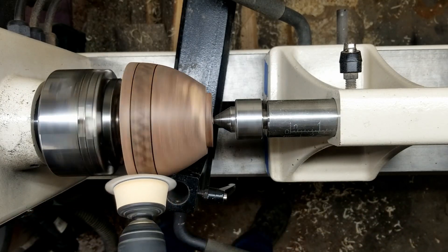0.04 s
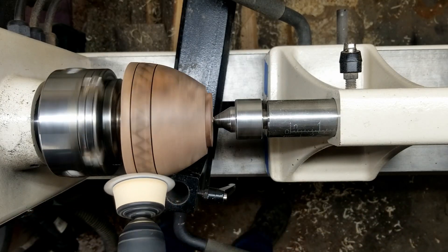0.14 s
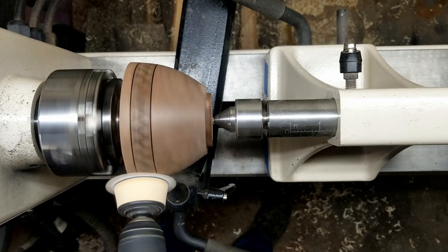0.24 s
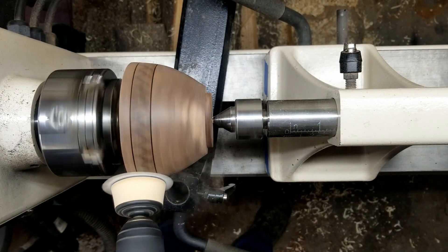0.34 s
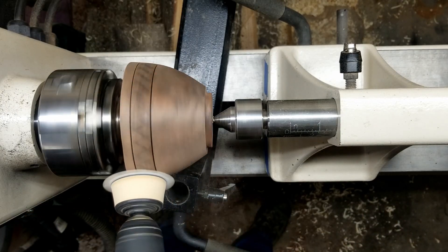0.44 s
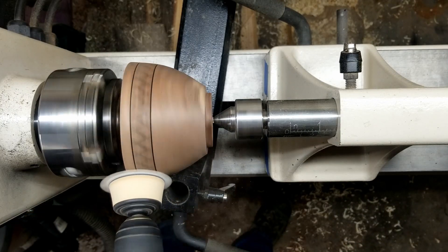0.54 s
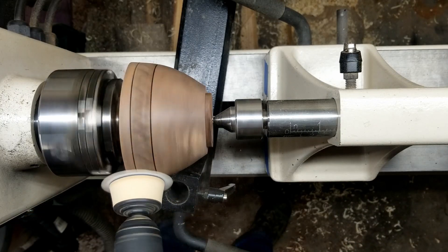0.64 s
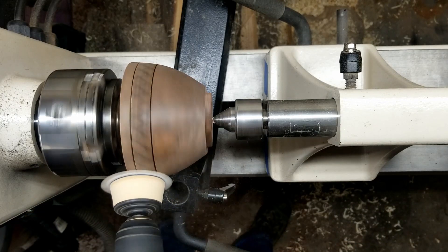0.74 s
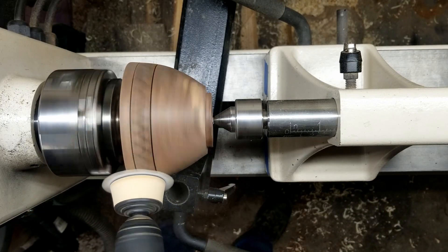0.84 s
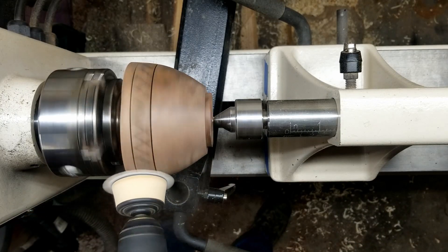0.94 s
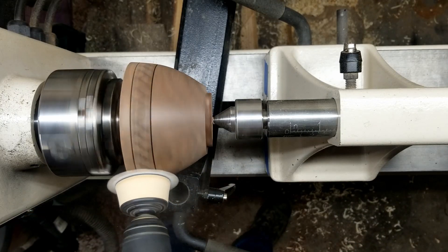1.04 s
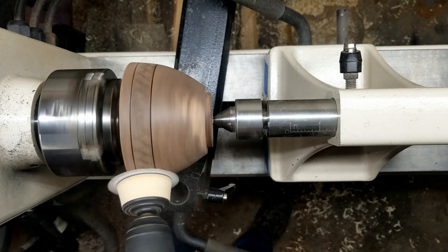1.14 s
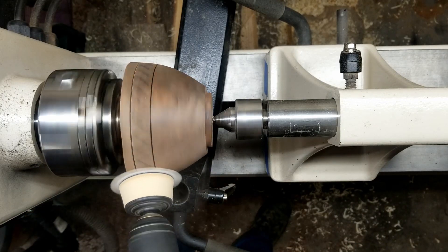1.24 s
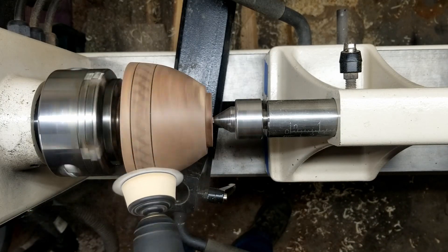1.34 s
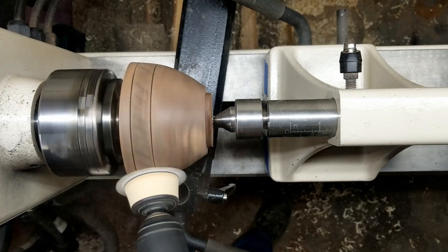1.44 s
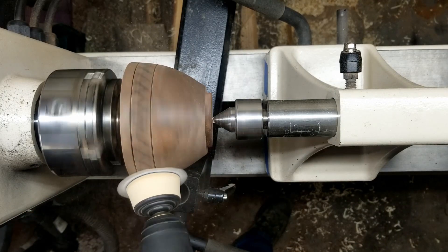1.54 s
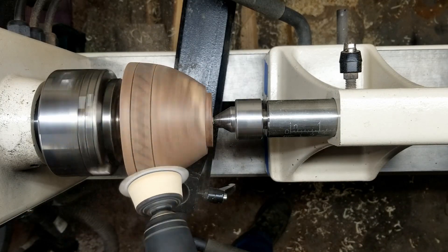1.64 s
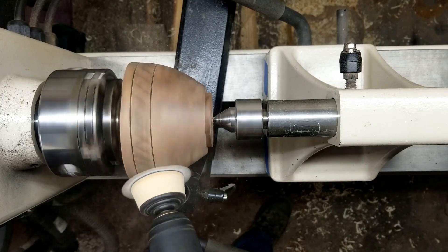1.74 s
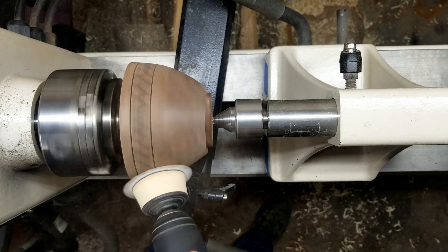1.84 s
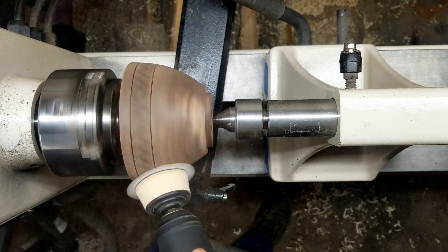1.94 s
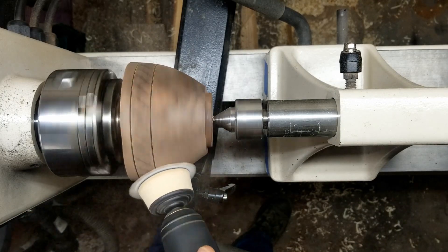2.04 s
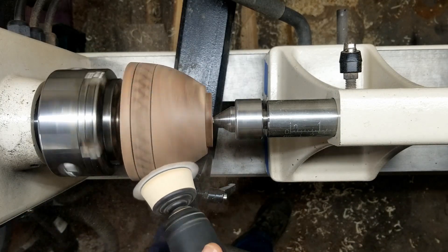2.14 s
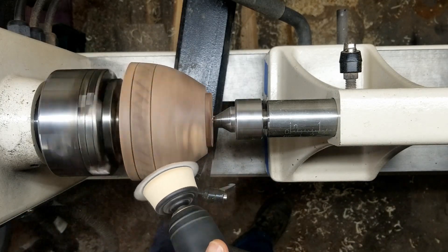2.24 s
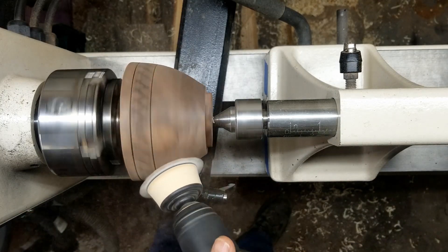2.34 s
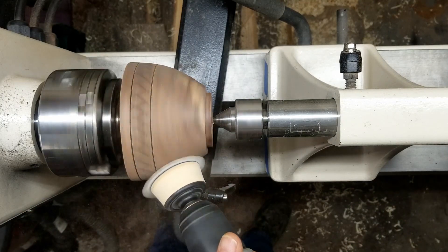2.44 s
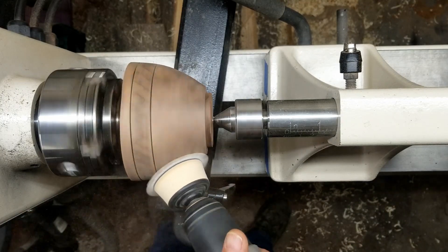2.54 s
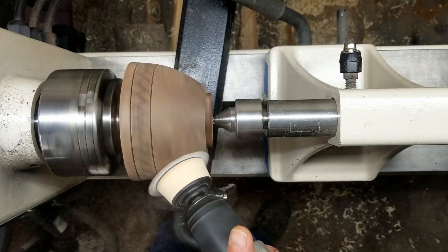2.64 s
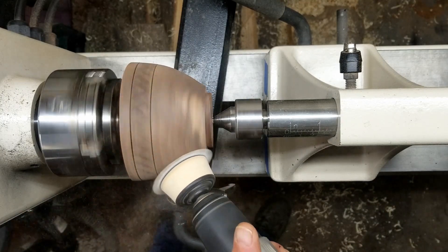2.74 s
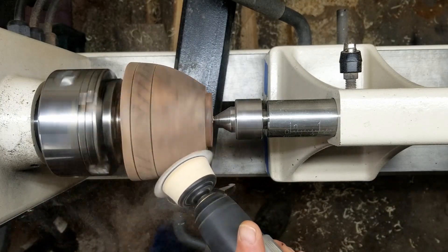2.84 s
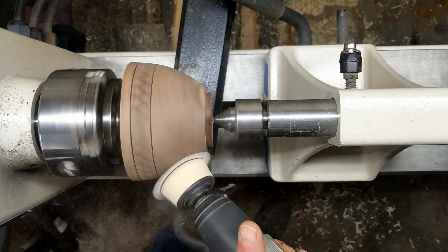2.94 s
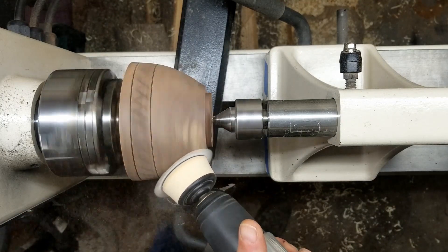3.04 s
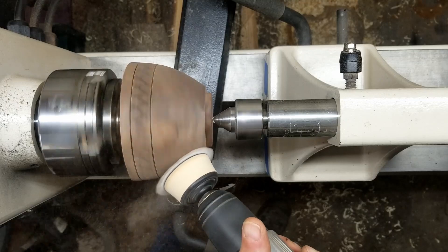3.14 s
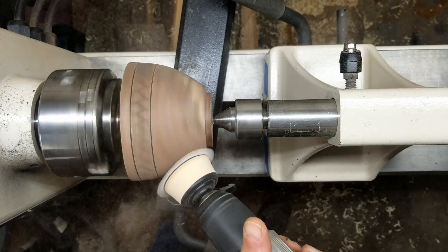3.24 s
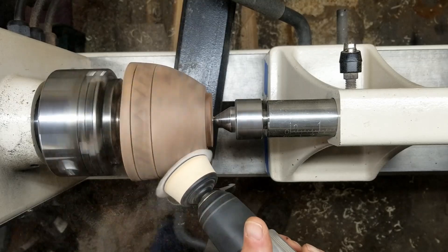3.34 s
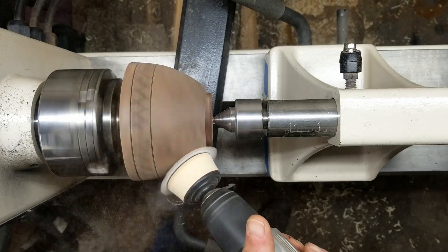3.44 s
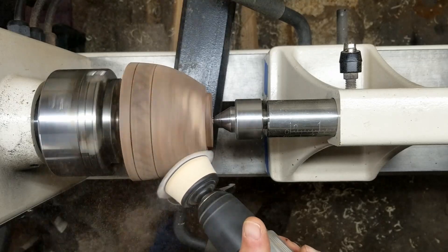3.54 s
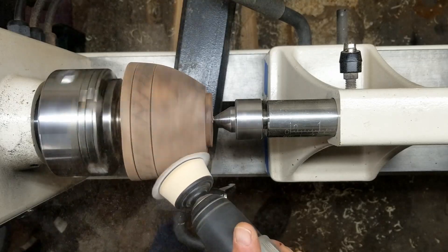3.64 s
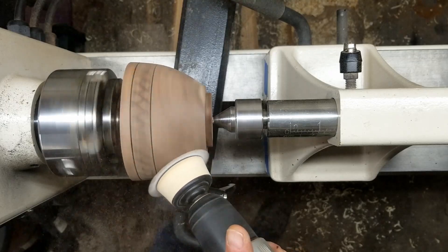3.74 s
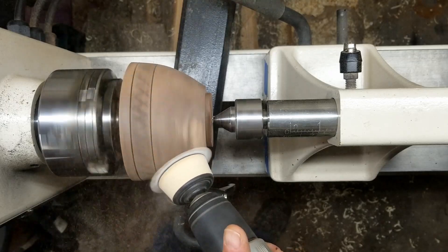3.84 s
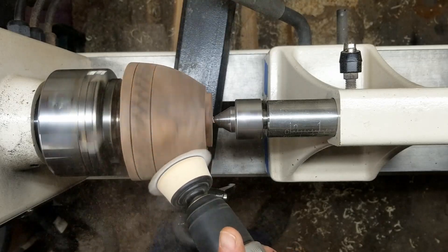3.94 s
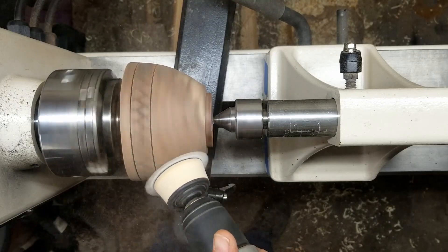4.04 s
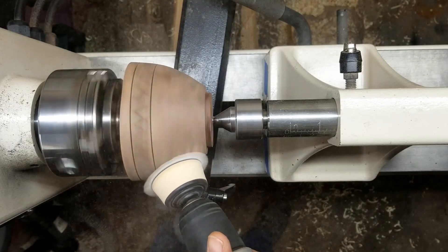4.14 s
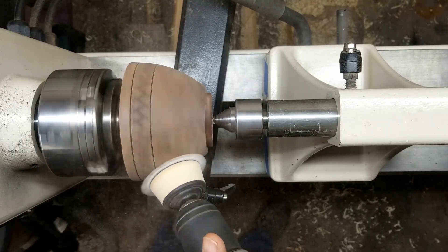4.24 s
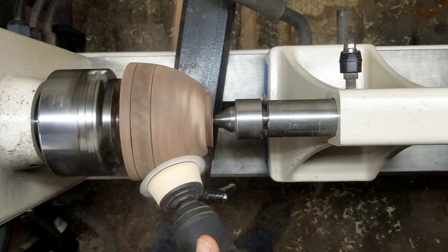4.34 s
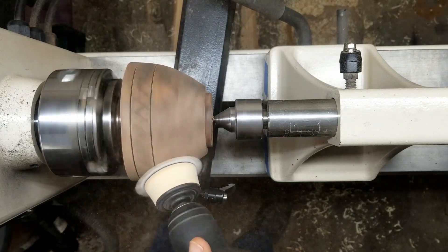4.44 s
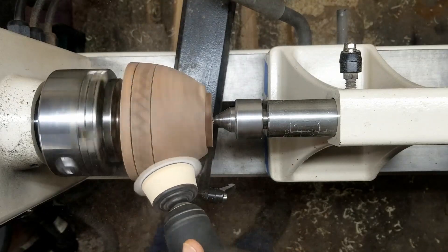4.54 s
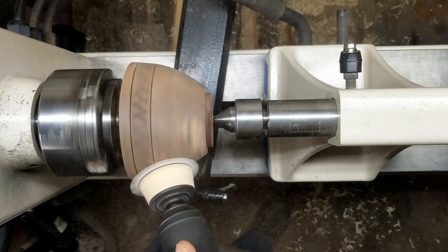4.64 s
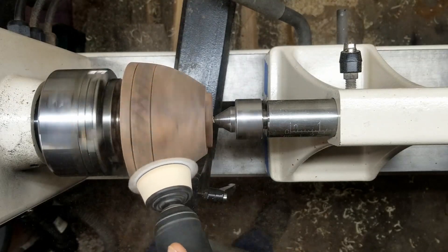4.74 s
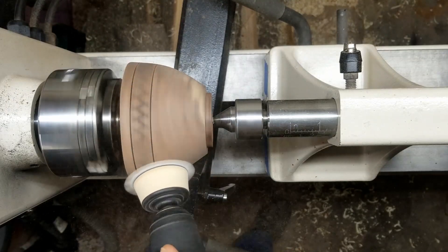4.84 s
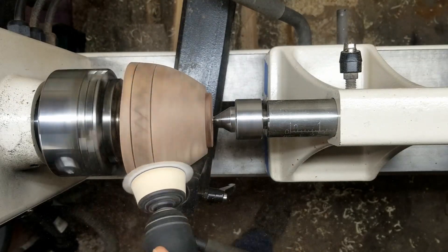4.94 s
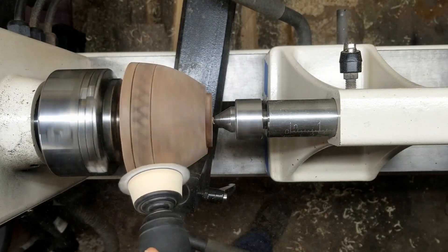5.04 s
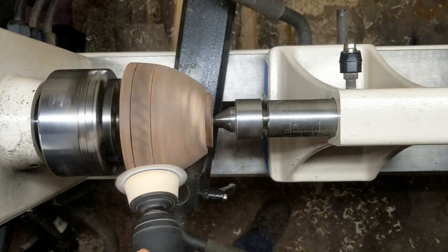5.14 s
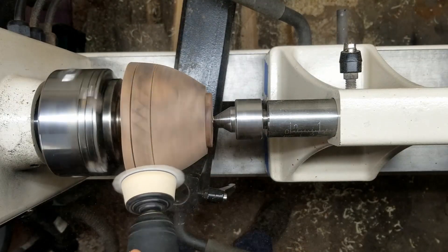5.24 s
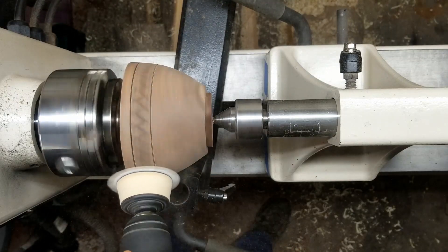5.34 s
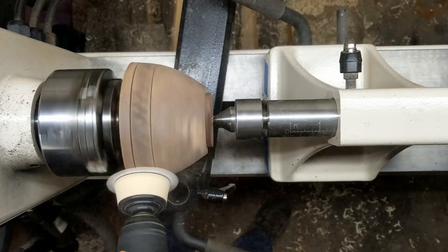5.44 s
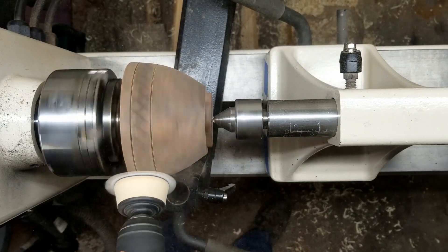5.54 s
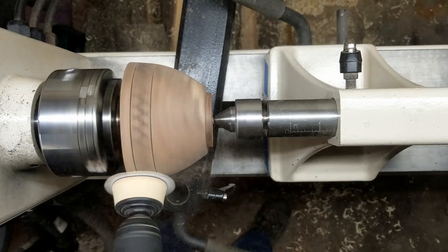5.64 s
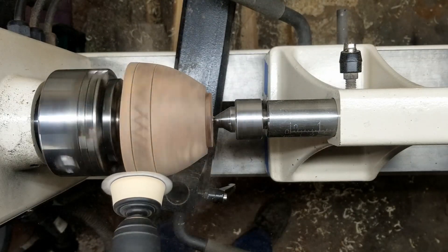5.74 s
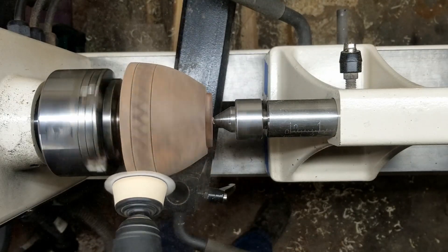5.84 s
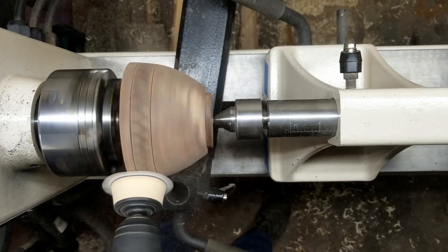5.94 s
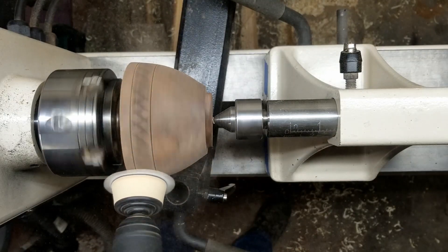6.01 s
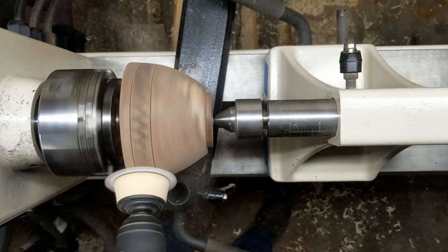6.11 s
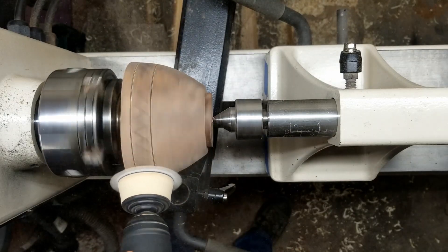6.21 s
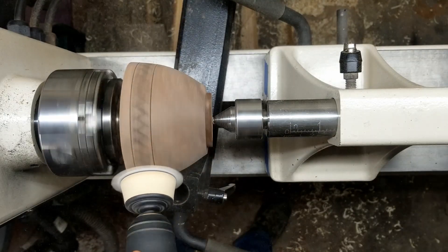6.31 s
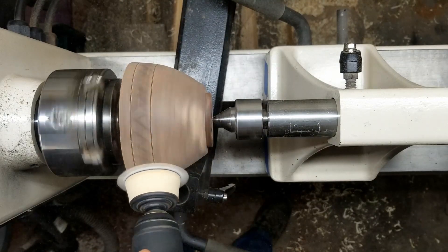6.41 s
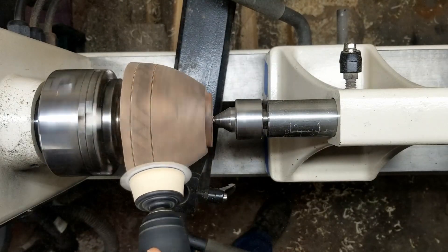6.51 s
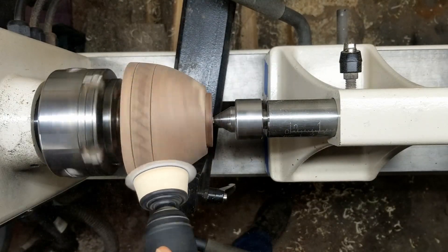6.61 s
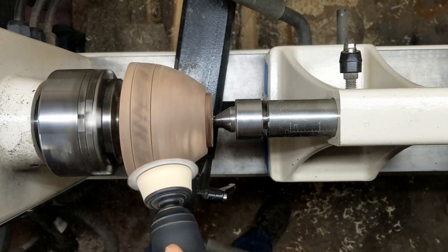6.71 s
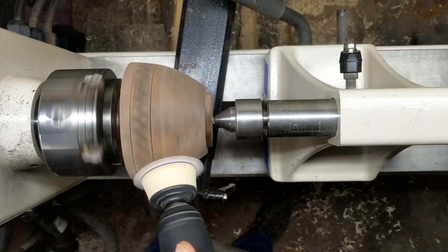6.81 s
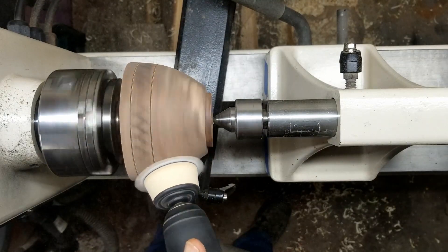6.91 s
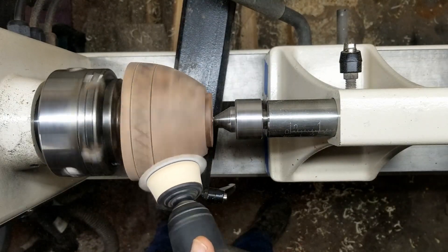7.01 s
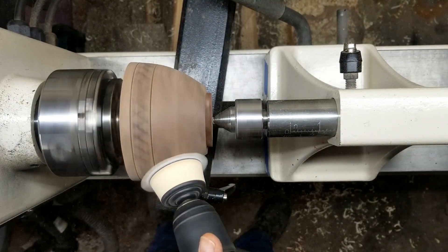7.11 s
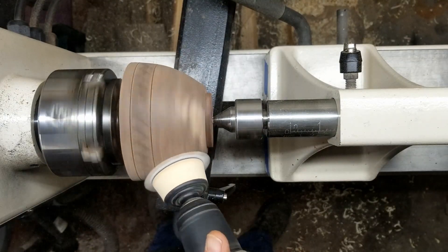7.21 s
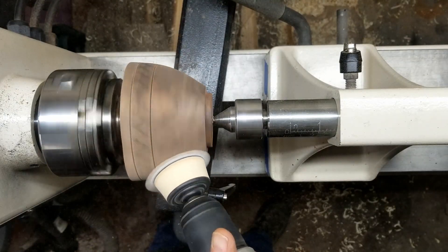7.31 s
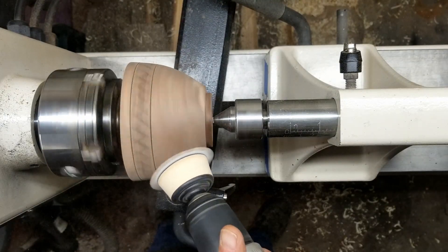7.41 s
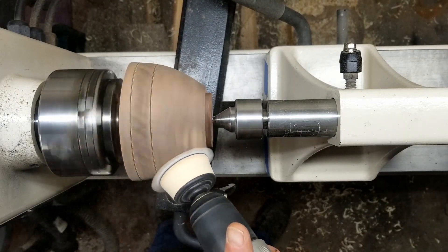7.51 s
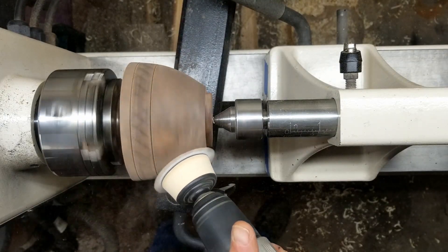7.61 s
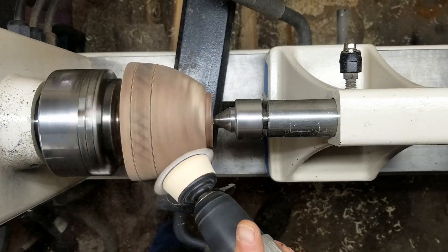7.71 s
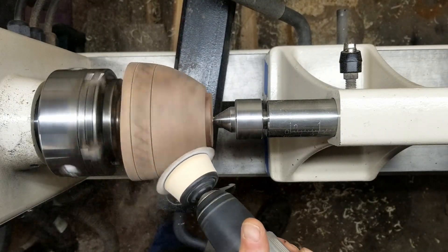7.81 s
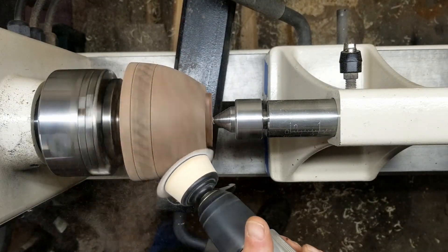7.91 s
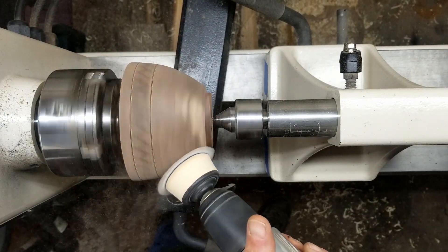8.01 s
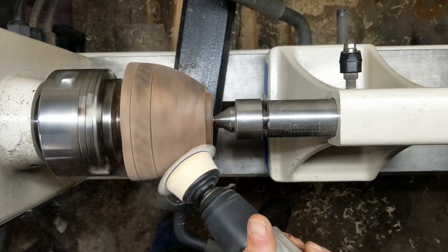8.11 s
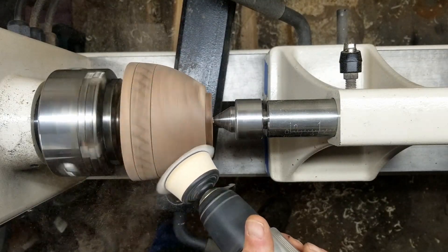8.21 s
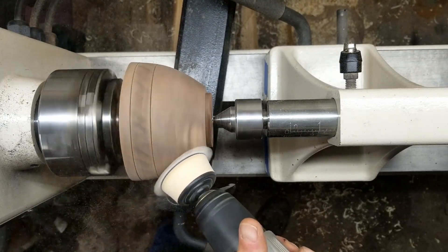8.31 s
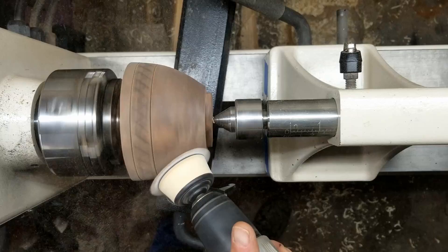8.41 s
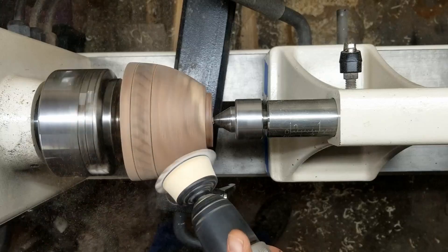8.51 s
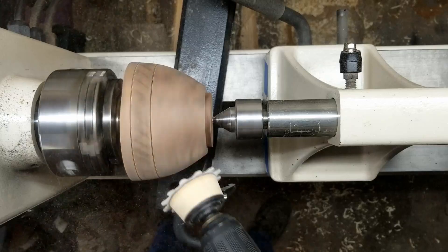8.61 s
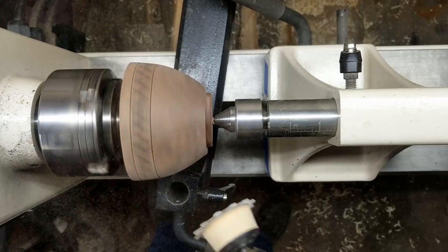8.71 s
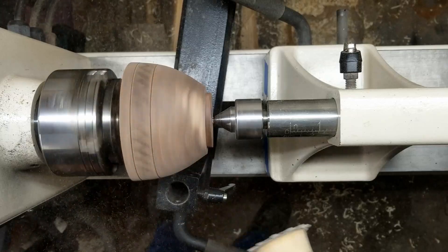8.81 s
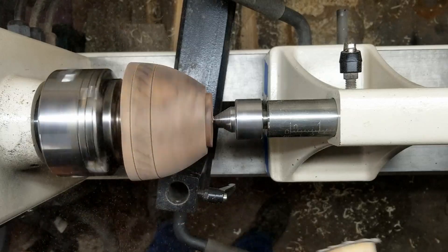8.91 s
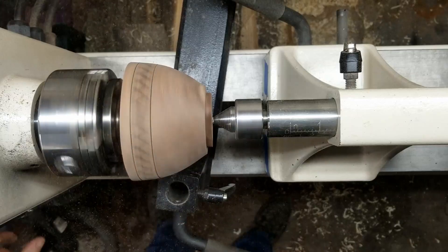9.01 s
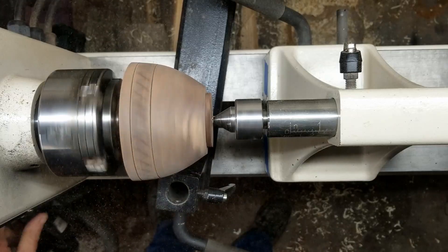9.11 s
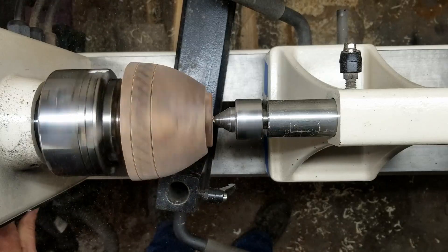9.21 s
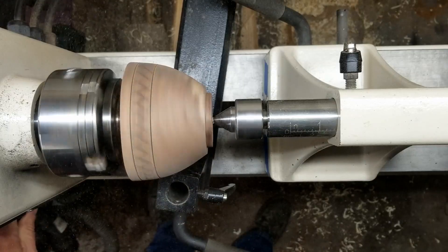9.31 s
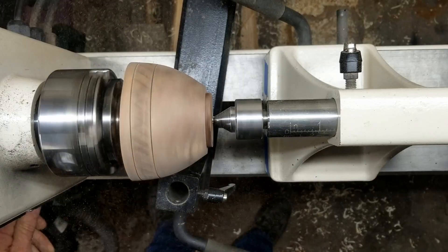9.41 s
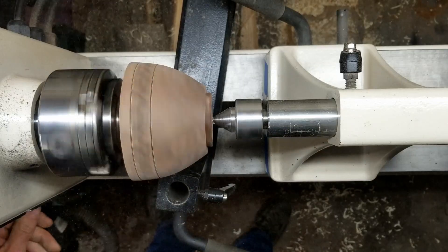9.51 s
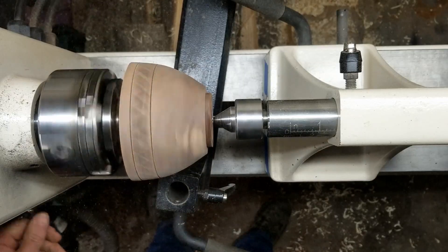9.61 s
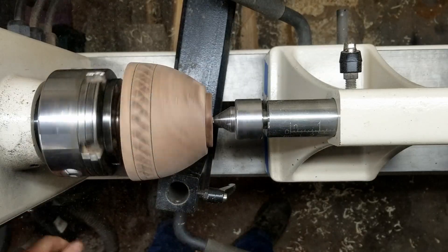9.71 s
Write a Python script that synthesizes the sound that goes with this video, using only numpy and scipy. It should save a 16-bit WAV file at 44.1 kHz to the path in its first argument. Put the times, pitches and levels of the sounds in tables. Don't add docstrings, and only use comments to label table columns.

```python
import sys
import numpy as np
from scipy import signal
from scipy.io import wavfile
from scipy.ndimage import uniform_filter1d, map_coordinates

SR = 44100
rng = np.random.default_rng(int(sys.argv[2]) if len(sys.argv) > 2 else 0)


def gain_from_decibels(decibels):
    exponent = np.asarray(decibels, float) / 20
    return 10 ** exponent


def waveform_to_disk(signal):
    frames = np.transpose(np.atleast_2d(signal))
    scaled = np.clip(frames, -1, 1) * 32767
    samples = np.round(scaled).astype(np.int16)
    wavfile.write(sys.argv[1], SR, samples)


N = 430416
TIME = np.arange(N) / SR

# (time [s], speed [turns/s])
MOTOR_SPEED = [(.24, 327.6), (.85, 322.8), (1.7, 318.8), (2.25, 317.8), (2.72, 319.5), (3.06, 316.0),
               (3.2, 317.2), (3.72, 316.8), (4.1, 319.0), (4.45, 318.2), (4.85, 319.5), (5.27, 317.8),
               (5.61, 317.9), (6.8, 323.5), (7.2, 321.6), (7.48, 322.1), (8.16, 316.7), (8.5, 317.6)]
USUAL_SPEED = 319
TRIGGER_OFF_S, COAST_LOSS_PER_S2 = 8.5, 360
LET_GO_S, LET_GO_DB = .12, -7
SPEEDUP_SMOOTH_S, SPEEDUP_FELT = .25, 2.4
# (level [dB], rise with speeding up [dB per turn/s2], with speed [dB per turn/s], with warming grease [dB/s])
FIFTH, THIRD, FIRST = (-37.5, -0.1, .15, 0.16), (-50.5, 0.95, 1.2, 0.63), (-56.5, 0, 0.35, 0.83)
PLANET_DB = -37
# (multiple of motor speed [x], level [dB])
COMMUTATOR_LINES = [(11, -18), (13, -16), (24, -14), (36, -13), (48, -20), (11.25, -17)]
# (multiple of motor speed [x], level [dB])
PLANET_LINES = [(1.8, -20), (11.59, -17), (8.89, -14), (5.95, -11)]
# (multiple of motor speed [x], level [dB])
UNBALANCE_LINES = [(2, -21), (4, -13), (6, -10)]
# (time [s], length [s], left level [dB], right level [dB], left lead [rad])
VENT_TURNS = [(.2, .8, -30.5, -35, .5), (.76, .42, -32, -41, .7), (1.45, .35, -35, -34, .1),
              (1.87, .4, -37, -41, -1.0), (2.7, .66, -36, -36, -2.5), (3.4, .82, -38, -34.5, -5.6),
              (4.1, .38, -37, -36, -2.6), (4.75, .3, -36, -38, -6.3), (5.3, .85, -31, -39, -6.2),
              (6.1, .7, -40, -42, -5.0), (6.75, .28, -37, -46, -5.5), (7.06, .3, -41, -34, -8.5),
              (7.55, .5, -34, -39, -8.2), (8.13, .58, -37, -33.5, -11), (8.545, .09, -30, -31, -12.5)]
VENT_EDGE_S, VENT_FLOOR_DB = 0.16, -45.5

# (time [s], left-right difference [dB], pressure [dB])
PAD_PATH = [(0, 2.5, -9), (.7, 2.5, -21), (1.2, 2.5, -18), (1.55, 1.4, -5.5), (2.1, 0.8, -0.5),
            (2.75, .2, -0.5), (3.3, -0.8, 2.5), (4.1, 0.5, 4), (4.6, 0.9, 3.5), (5.1, 2.5, 0.5),
            (5.7, 3, -7), (5.95, 2.5, -2), (6.4, 2, -3.5), (6.8, 1.5, -5), (7.2, 1.1, -1.5), (7.8, -0.5, 3),
            (8.54, 0.4, 0.5)]
LAG_PER_DB = -1.5
# (frequency [Hz], width [Hz], level [dB])
HOUSING_MODES = [(359.7, 56, -15.5), (448, 39, -14), (626, 77, -10), (825, 144, -12.5), (1255, 177, -7.5),
                 (1545, 120, -3), (1875, 135, -3), (2283, 293, -9.5), (2624, 260, -8.5), (3340, 450, -13.5),
                 (3710, 220, -10.5), (4220, 1180, -15.5)]
RATTLE_DB, RATTLE_PER_PRESSURE, RATTLE_PER_PAN = -27.5, 0.072, -0.1

# (frequency [Hz], level [dB per Hz])
GRIT_SPECTRUM = [(1700, -31), (2500, -1), (2800, -9), (3600, -8.5), (4300, -10.5), (5200, -11.5),
                 (5900, -5), (7000, -7), (8300, -9), (10500, -5.5), (12400, -2.5), (14000, -4.5),
                 (15600, -3), (18000, -3.5)]
# (frequency [Hz], likeness [-1 to 1])
SIDE_LIKENESS = [(60, .85), (300, .7), (700, .78), (1400, .88), (3000, .4), (6000, 0.03), (15000, 0.02)]
# (frequency [Hz], left-right difference [dB])
HISS_LEAN = [(60, 0.5), (110, 0.0), (200, -0.5), (380, 1.5), (700, -0.5), (1290, 4), (2380, -3),
             (4400, 3.5), (8120, -3), (15000, 3.5)]
GRIT_PER_PRESSURE, GRIT_PER_PAN, FINE_DB, FINE_PER_PAN = 0.098, 0.3, -31.5, 0.445
HISS_PAN_SHARE = .75
# (time [s], length [s], level [dB])
DUST_PUFFS = [
    (0.284, .03, -26.5),
    (.325, .05, -24),
    (.4, 0.051, -25.5),
    (.49, 0.033, -24.5),
]
PUFF_EDGE_S = 0.045
BED_ECHO, BED_LAG, BED_LAG_PER_DB = .25, 29.8, .3

# (time [s], share of full speed [0 to 1])
LATHE_TURNING = [
    (0, 0.92),
    (9.42, 1.0),
    (9.76, 0.67),
]
# (time [s], level [dB])
RUMBLE_LEVEL = [(0, -61), (1.8, -63), (2.6, -66.5), (3.6, -61.5), (6.2, -63.5), (6.45, -54), (6.9, -61),
                (7.7, -59.5), (9.1, -49), (9.5, -56.5), (9.68, -47)]
# (frequency [Hz], level [dB per Hz])
FRAME_SPECTRUM = [(13, -35.5), (22, -10.5), (59, 12.5), (119, 6.5), (146, -5), (209, -7), (237, -13),
                  (260, -14.5), (340, -37), (570, -120)]
INVERTER_HZ = 9020
# (offset at full speed [Hz], level [dB])
INVERTER_LINES = [(-70, -79), (-38, -79), (-11, -79), (43, -80), (70, -76), (97, -86)]
BELT_HZ, BELT_SAG, BELT_DB = 648, .3, -64.5
BELT_SWELL = (9.21, 0.87)   # (time [s], length [s])

# (frequency [Hz], level [dB per Hz])
SHOP_SPECTRUM = [(88, -31), (150, -14), (215, -7.5), (303, -32), (450, -21), (635, -24), (800, -23.5),
                 (1700, -30), (2900, -44), (6000, -42), (9000, -41.5), (13200, -42.5), (14300, -54)]
SHOP_DB = -55.5
ROOM_T60_S, ROOM_DB, WALL_CUT_HZ = 0.18, -8.5, 9500
FAR_T60_S, FAR_DB = 0.5, -7
SHELF_SOAK_HZ, SHELF_SOAK = (1180, 2200), 0.43
TOP_CUT_HZ = 15780

# (time [s], peak level [dB], rattle length [s])
CLACK_HITS = [
    (8.5591, -4, 0.0019),
    (8.5606, -8.5, .0012),
    (8.5635, -13.5, 0.0033),
    (8.5762, -12.5, 0.0032),
    (8.5800, -12, 0.0027),
    (8.5832, -13, 0.0018),
    (8.592, -29.5, .005),
]
# (frequency [Hz], level [dB], time to fall 60 dB [s])
SHELL_MODES = [(450, -15.5, 0.015), (798, -12, 0.009), (1440, -0.5, 0.0071), (1880, -1, 0.011),
               (2600, -6.5, .007), (3650, -8, 0.0042), (4560, -13.5, .004), (6300, -13, .003),
               (9040, -9, .002), (12200, -10, 0.00197), (14800, -13, .002)]
# (time [s], peak level [dB], rattle length [s])
SWITCH_HITS = [
    (9.223, -54, 0.0027),
    (9.2365, -52, .002),
    (9.4078, -45, 0.0018),
    (9.4097, -22.5, 0.0019),
    (9.413, -35.5, 0.011),
    (9.425, -42, .05),
]
# (frequency [Hz], level [dB], time to fall 60 dB [s])
BOX_MODES = [(135, -10.5, 0.054), (350, -9.5, 0.017), (980, -6.5, 0.0072), (1730, -1, 0.0057),
             (2400, -6, 0.0092), (3700, 2.5, 0.0029), (4800, 3, 0.0022), (6240, 1, 0.005),
             (7350, -16, 0.0026), (9700, -2, .002), (12200, 8, 0.0018), (14700, -4.5, .002)]


def rms_one(x):
    return x / np.sqrt(np.mean(x ** 2) + 1e-20)


def in_time(rows):
    seconds, *columns = np.transpose(rows)
    return [np.interp(TIME, seconds, column) for column in columns]


def at_hz(points, hz):
    at, value = np.transpose(points)
    return np.interp(np.log(hz), np.log(np.maximum(at, 1)), value)


def drift(rate):
    r = np.exp(-80 * np.pi * rate / SR)
    noise = rng.standard_normal(N // 40 + 2002)
    slow = signal.lfilter([1], [1, -2 * r, r * r], noise)[2000:]
    return np.interp(np.arange(N) / 40, np.arange(len(slow)), rms_one(slow))


def swell(middle_s, length_s, edge_s):
    return np.clip((length_s / 2 - np.abs(TIME - middle_s)) / edge_s + .5, 0, 1)


def two_sides(mid, side, hz):
    alike = np.clip(at_hz(SIDE_LIKENESS, hz), -1, 1)
    return np.sqrt(1 + alike) * mid + np.sqrt(1 - alike) * side * [[1], [-1]]


def band_noise(spectrum, patchy_db):
    lowest, highest = spectrum[0][0], spectrum[-1][0]
    count = int(3 * np.log2(highest / lowest)) + 1
    edges = np.geomspace(lowest, highest, count + 1)
    white = rng.standard_normal((2, 2, N))
    for k, (low, high) in enumerate(zip(edges, edges[1:])):
        band_pass = signal.butter(2, [low, high], "band", fs=SR, output="sos")
        mid, side = signal.sosfilt(band_pass, white[k % 2])
        hz = np.sqrt(low * high)
        gain = gain_from_decibels(at_hz(spectrum, hz) + patchy_db * drift(7.6))
        yield hz, gain * two_sides(mid, side, hz)


def tone(turns, level_db, flutter_db, wobble):
    line = np.sqrt(2) * np.sin(turns * 2 * np.pi + wobble * drift(8))
    flutter = np.array([drift(6.5), drift(8.7)])
    return line * gain_from_decibels(level_db + flutter_db * flutter)


def place(x, pan_db):
    n = np.arange(N)
    half_lag = LAG_PER_DB * pan_db / 2
    both = x * np.ones((2, 1))
    left = map_coordinates(both[0], [n - half_lag], order=3)
    right = map_coordinates(both[1], [n + half_lag], order=3)
    return np.array([gain_from_decibels(pan_db / 2) * left, gain_from_decibels(-pan_db / 2) * right])


def motor():
    speed, = in_time(MOTOR_SPEED)
    speedup = np.gradient(speed) * SR
    speedup = uniform_filter1d(speedup, int(SPEEDUP_SMOOTH_S * SR), mode="nearest")
    speedup = np.minimum(speedup, SPEEDUP_FELT)
    let_go_db = LET_GO_DB * np.clip((TIME - TRIGGER_OFF_S) / LET_GO_S + 1, 0, 1)
    speed = speed - COAST_LOSS_PER_S2 * np.clip(TIME - TRIGGER_OFF_S, 0, .1)
    levels = []
    for db, follow, fast, warm in (FIFTH, THIRD, FIRST):
        level = db + follow * speedup + fast * (speed - USUAL_SPEED) + warm * TIME
        levels.append(level + let_go_db)
    return np.cumsum(speed) / SR, let_go_db, levels


def vents():
    power = 0
    for middle, length, left, right, _ in VENT_TURNS:
        opening = swell(middle, length, min(VENT_EDGE_S, length / 4))
        power = power + (opening * gain_from_decibels(np.array([[left], [right]]))) ** 2
    left_db, right_db = 10 * np.log10(power + gain_from_decibels(VENT_FLOOR_DB) ** 2)
    lead, = in_time([(row[0], row[4]) for row in VENT_TURNS])
    return left_db, right_db, lead


def whine(turns, fifth_db, planet_db, third_db, first_db, commutator_db):
    lines = [(5, fifth_db - .3), (5.795, planet_db - .3), (3, third_db - .3), (1, first_db - 3.0)]
    lines += [(k, commutator_db + db) for k, db in COMMUTATOR_LINES]
    lines += [(k, planet_db + db) for k, db in PLANET_LINES]
    lines += [(k, fifth_db + db) for k, db in UNBALANCE_LINES]
    return sum(tone(k * turns + rng.random(), db, flutter_db=2.0, wobble=.3) for k, db in lines)


def commutator(turns, left_db, right_db, lead):
    bars = 12 * turns + np.array([lead, -lead]) / (4 * np.pi)
    return tone(bars, np.array([left_db, right_db]) + 0.68, flutter_db=1.3, wobble=0.11)


def gear_rattle(turns):
    beat = 1 + 0.22 * np.cos(2 * np.pi * turns) + 0.17 * np.cos(2 * np.pi * .805 * turns)
    uneven = gain_from_decibels(2.0 * rng.exponential(1, N))
    mid, side = beat * rng.standard_normal((2, N)) * uneven
    out = 0
    for k, (hz, width, level_db) in enumerate(HOUSING_MODES):
        r, w = np.exp(-np.pi * width / SR), 2 * np.pi * hz / SR
        knocks = two_sides(mid, side, hz)
        ringing = signal.lfilter([1 - r * r, 0, r * r - 1], [1, -2 * r * np.cos(w), r * r], knocks)
        out = out + (-1) ** k * gain_from_decibels(level_db + 1.02 * drift(1.6)) * ringing
    return rms_one(out)


def grit_hiss(turns, grit_db, fine_db):
    grit_change, fine_change = grit_db - grit_db.mean(), fine_db - fine_db.mean()
    out = 0
    for hz, band in band_noise(GRIT_SPECTRUM, patchy_db=0.52):
        fine = np.clip(np.log2(hz / 6500), 0, 1)
        lean_db = at_hz(HISS_LEAN, hz) / 2 * np.array([[1], [-1]])
        out = out + band * gain_from_decibels(lean_db + (2.0 - fine) * grit_change + fine * fine_change)
    throb = 1 + 0.089 * np.cos(2 * np.pi * turns)
    throb += 0.081 * np.cos(2 * np.pi * 0.9 * turns) + 0.055 * np.cos(2 * np.pi * 0.17 * turns)
    return gain_from_decibels(-26.5) * rms_one(out) * throb


def bed_echo(x, pan_db):
    late = np.arange(N) - BED_LAG - BED_LAG_PER_DB * pan_db
    return x + BED_ECHO * np.array([map_coordinates(side, [late], order=3) for side in x])


def drill():
    turns, let_go_db, (fifth_db, third_db, first_db) = motor()
    left_db, right_db, lead = vents()
    pan_db, pressure_db = in_time(PAD_PATH)
    running = np.exp(-np.maximum(TIME - 8.559, 0) / .006)
    coasting = np.exp(-np.maximum(TIME - 8.575, 0) / 0.0089)

    planet_db = PLANET_DB + pressure_db + let_go_db
    lines = whine(turns, fifth_db, planet_db, third_db, first_db, (left_db + right_db) / 2)
    lines = place(lines, pan_db) + commutator(turns, left_db, right_db, lead)

    rattle_db = RATTLE_DB + RATTLE_PER_PRESSURE * pressure_db + RATTLE_PER_PAN * pan_db
    body = running * gain_from_decibels(rattle_db - 1.5) * gear_rattle(turns) + brake_clack()

    grit_db = GRIT_PER_PRESSURE * pressure_db + GRIT_PER_PAN * pan_db
    puffs = sum((gain_from_decibels(db) * swell(s, length, PUFF_EDGE_S)) ** 2 for s, length, db in DUST_PUFFS)
    fine_db = 10 * np.log10(gain_from_decibels(FINE_DB + FINE_PER_PAN * pan_db) ** 2 + puffs)
    grain = gain_from_decibels(0.44 * drift(29))
    hiss = coasting * grain * grit_hiss(turns, grit_db, fine_db)
    lean = gain_from_decibels(HISS_PAN_SHARE * (pan_db - pan_db.mean()) / 2 * [[1], [-1]])
    return place(body, pan_db) + bed_echo(hiss, pan_db) * lean, running * lines


def lathe():
    (speed,), (rumble_db,) = in_time(LATHE_TURNING), in_time(RUMBLE_LEVEL)
    spun = np.cumsum(speed) / SR
    whistle = sum(tone(INVERTER_HZ * TIME + hz * spun, db, flutter_db=1.2, wobble=.4)
                  for hz, db in INVERTER_LINES)
    belt_turns = np.cumsum(BELT_HZ * (1 - BELT_SAG * (1 - speed))) / SR
    belt = swell(*BELT_SWELL, .1) * tone(belt_turns, BELT_DB, flutter_db=5.5, wobble=.6)
    frame = sum(band for hz, band in band_noise(FRAME_SPECTRUM, patchy_db=4.0))
    return whistle + belt + gain_from_decibels(rumble_db) * rms_one(frame)


def shop_air():
    return gain_from_decibels(SHOP_DB) * rms_one(sum(band for hz, band in band_noise(SHOP_SPECTRUM, patchy_db=0.4)))


def workshop(x):
    t = np.arange(SR // 2) / SR
    slopes = gain_from_decibels(-60 * t / ROOM_T60_S) + gain_from_decibels(FAR_DB - 60 * t / FAR_T60_S)
    tail = rng.standard_normal((2, len(t))) * slopes * (t > .004)
    tail = signal.sosfilt(signal.butter(1, WALL_CUT_HZ, fs=SR, output="sos"), tail)
    soak_band = signal.butter(1, SHELF_SOAK_HZ, "band", fs=SR, output="sos")
    tail = tail - SHELF_SOAK * signal.sosfilt(soak_band, tail)
    tail = tail / np.sqrt(np.sum(tail ** 2, axis=1)[:, None])
    return gain_from_decibels(ROOM_DB) * signal.fftconvolve(x, tail, axes=1)[:, :N]


def rattle(hits, modes, crack_db):
    start, size = round(hits[0][0] * SR) - 100, SR // 2
    t = (start + np.arange(size)) / SR
    run = sum(gain_from_decibels(db) * (t >= s) * np.exp(-np.maximum(t - s, 0) / length) for s, db, length in hits)
    contacts = run * (rng.random(size) < 16000 / SR) + 1e-18
    firm = np.maximum(np.diff(run, prepend=0), 0)
    crack = contacts ** 2 / run.max() * rng.standard_normal(size)
    sound = gain_from_decibels(crack_db) * np.diff(crack, prepend=0)
    for hz, level_db, t60 in modes:
        r, w = gain_from_decibels(-60 / (t60 * SR)), 2 * np.pi * hz / SR
        struck = contacts * rng.standard_normal(size) + 2.9 * firm
        sound += gain_from_decibels(level_db - 16) * signal.lfilter([.5, 0, -.5], [1, -2 * r * np.cos(w), r * r], struck)
    out = np.zeros(N + size)
    out[start:start + size] = sound
    return out[:N]


def brake_clack():
    return rattle(CLACK_HITS, SHELL_MODES, crack_db=-4.5)


def lathe_switch():
    return place(rattle(SWITCH_HITS, BOX_MODES, crack_db=-6), 3.9 + 0 * TIME)


def scene():
    noise, lines = drill()
    near = noise + lathe_switch()
    echo = workshop(near + gain_from_decibels(-12) * lines)
    return near + lines + echo + lathe() + shop_air()


def top_cut(x):
    return signal.sosfilt(signal.butter(12, 17100, fs=SR, output="sos"), x)


def record(dry):
    cut = signal.sosfilt(signal.ellip(10, .2, 45, TOP_CUT_HZ, fs=SR, output="sos"), dry)
    return top_cut(cut)


dry = scene()
out = record(dry)
waveform_to_disk(out)
```